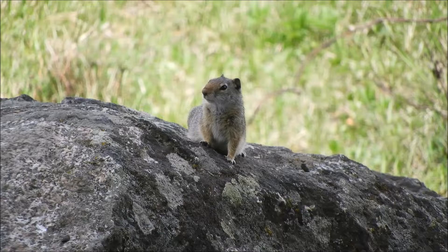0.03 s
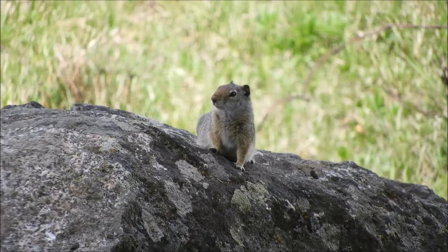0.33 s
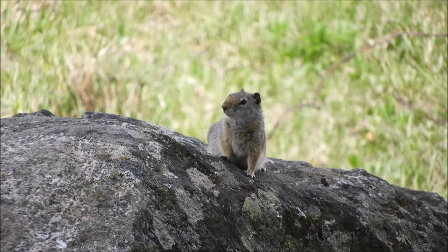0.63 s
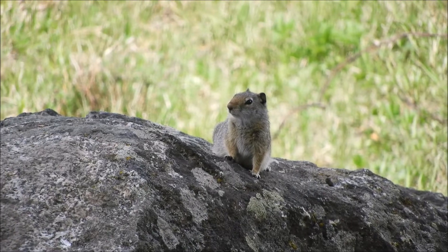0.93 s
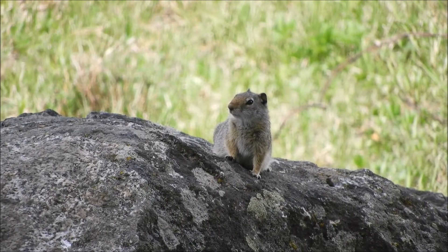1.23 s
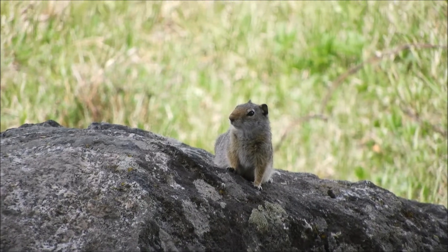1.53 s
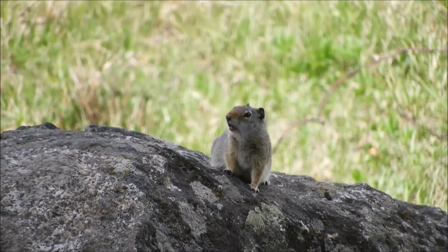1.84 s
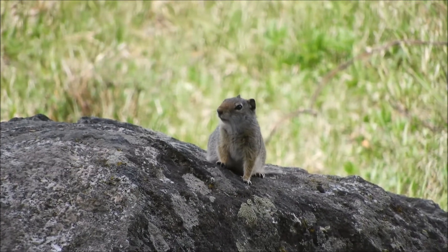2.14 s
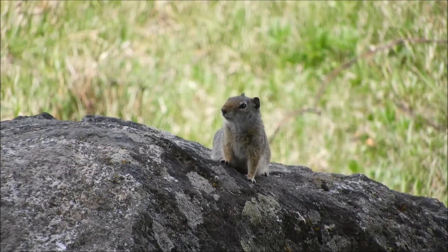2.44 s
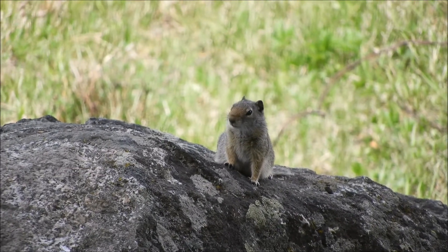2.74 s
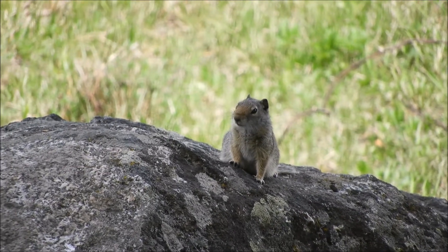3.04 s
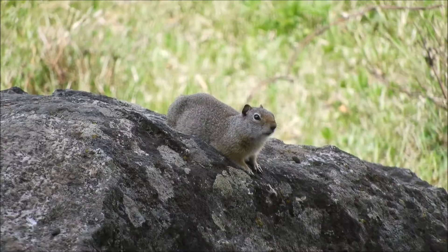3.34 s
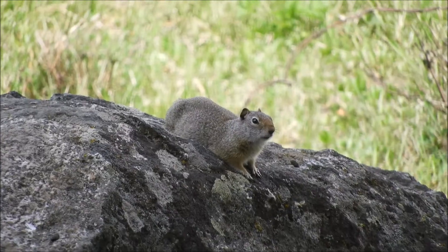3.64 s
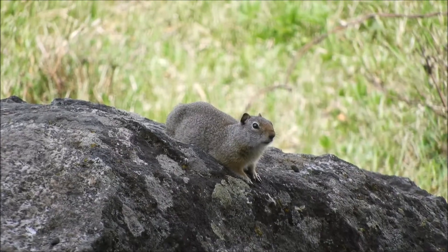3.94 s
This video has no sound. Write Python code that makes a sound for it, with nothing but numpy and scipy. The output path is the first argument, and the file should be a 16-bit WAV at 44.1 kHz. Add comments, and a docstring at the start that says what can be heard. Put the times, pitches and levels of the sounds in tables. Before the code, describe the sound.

A ground squirrel gives two quick high chirps over light wind rumble and hiss.

```python
"""After a moment of silence, light wind rumbles and thumps on two microphone ports over hiss and a low hum.
A far bird trills faintly, grass rustles, and something small and close clicks. Midway, a ground squirrel
on a boulder gives two quick alarm chirps: whistles that drop onto a held pitch and linger as the meadow
scatters them back. A second click follows and the wind picks up. The sound cuts out for an instant,
then the strongest gust hits."""
import sys
import numpy as np
from scipy import signal
from scipy.fft import rfft, irfft, next_fast_len
from scipy.io import wavfile
from scipy.ndimage import uniform_filter1d, map_coordinates

SR = 44100
rng = np.random.default_rng(int(sys.argv[2]) if len(sys.argv) > 2 else 0)


def int16_out(signal):
    """Quantize to a 16-bit WAV file."""
    q = np.round(np.clip(np.atleast_2d(signal).T, -1, 1) * 32767)
    wavfile.write(sys.argv[1], SR, q.astype(np.int16))


N = 176400

# alarm chirps (start [s], length [s], held pitch [Hz], fundamental level [dB], octave level [dB])
CHIRPS = [(2.0795, 0.054, 4413, -29.5, -28), (2.2036, 0.034, 4301, -28, -27.5)]
# colour of the breathy rasp (frequency [Hz], gain [dB])
RASP_EQ = [(2500, -30), (4500, -5), (7000, 5), (10000, -11), (15000, -16)]
DROP_HZ, DROP_S, SETTLE_HZ, SETTLE_S = 640, .0019, 320, .0085
TONE_ATTACK_S, OCTAVE_ATTACK_SHARE, RELEASE_S = 0.0055, .27, 0.012
TONE_FADE_DB_PER_S, OCTAVE_FADE_DB_PER_S = 159, 444
THIRD_DB, RASP_DB = -35, -26  # third harmonic and rasp, relative to the octave
JITTER_SHARE, FLUTTER_DB = 0.0022, 0.6  # roughness of pitch and level
CALL_LEAD_S = .000014  # the call reaches the left port first

# decay of the meadow's scattered tail (frequency [Hz], t60 [s])
MEADOW_DECAY = [(3000, 0.21), (4500, 0.26), (9000, 0.19), (14000, 0.069)]
# EQ on the send to the echoes (frequency [Hz], gain [dB])
MEADOW_EQ = [(3000, -2), (4150, -8), (4400, -0.5), (4850, -1), (5600, -5), (8500, -16), (14000, -20)]
MEADOW_DB = -3.5
FAR_ECHO_S, FAR_ECHO_DB, FAR_ECHO_T60, FAR_LOWPASS_HZ = .08, -17, 0.2, 5600

# two-stage clicks (snap time [s], snap level [dB], tap level [dB])
CLICKS = [(1.5655, -24, -37), (2.9483, -28.5, -38)]
# woody ring of the tap (frequency [Hz], level [dB], t60 [s])
TAP_MODES = [(1250, -11, 0.022), (2180, -6, 0.046), (2480, -6.5, 0.033), (2830, -3.5, 0.019),
             (3870, -6.5, 0.016)]
# colour of the tap's noise burst (frequency [Hz], gain [dB])
TAP_EQ = [(500, -12), (1200, -8), (2500, -3), (4000, -21), (5000, -27), (12000, -47)]
# bright ring of the snap (frequency [Hz], level [dB], t60 [s])
SNAP_MODES = [(4400, -4, 0.017), (5530, -9.5, 0.017), (6730, -13.5, .013), (7600, -8, 0.011),
              (8970, -13.5, 0.013), (9860, -12, 0.0072)]
# colour of the snap's crack (frequency [Hz], gain [dB])
SNAP_EQ = [(1000, -27), (3500, -16), (4300, 6.5), (6400, -1), (8000, -1.5), (10300, 2), (12000, -12),
           (16000, -20)]
TAP_LEAD_S, TAP_ATTACK_S, TAP_NOISE_DB, TAP_NOISE_T60 = 0.0099, .0008, -7.5, 0.045
GRAZE_S, GRAZE_DB = .008, -6  # a light touch before the tap
SNAP_ATTACK_S, SNAP_HIGHPASS_HZ, REBOUND_S, REBOUND_DB = .00015, 3600, 0.001094, -4
CRACK_DB, CRACK_T60, CRACK_TAIL_DB, CRACK_TAIL_T60 = -7.5, 0.0055, -6.5, 0.043

# eddies that hit one port (time [s], level [dB], frequency [Hz], port [0 left, 1 right])
THUMPS = [(0.138, -17.5, 97, 0), (0.208, -17, 87, 0), (0.27, -13, 95, 0), (.294, -18, 77.4, 0),
          (.403, -22.5, 99, 0), (0.423, -14.5, 101, 0), (.486, -20, 116, 0), (1.404, -21, 109, 0),
          (1.486, -19.5, 109, 0), (1.6062, -7.5, 87, 0), (1.623, -17.5, 71, 0), (2.604, -23, 88, 1),
          (2.627, -17, 89, 1), (2.884, -15.5, 113, 0), (2.921, -16.5, 90, 1), (2.946, -17, 127, 1),
          (3.049, -14, 122, 0), (3.142, -16.5, 90, 1), (3.167, -21.5, 80, 0), (3.206, -16.5, 80.6, 0),
          (3.248, -17, 89, 0), (3.299, -11, 98, 0), (3.385, -17, 114, 0), (3.44, -16.5, 96, 0),
          (3.524, -21.5, 113, 1), (3.668, -17.5, 65, 0), (3.731, -10.5, 60, 0), (3.7476, -7, 131.3, 0),
          (3.777, -21, 69.6, 0)]
THUMP_LEAK_DB, THUMP_WIDTH_RAD = -27.5, 1.87
# gusts that drive the buffeting (time [s], level [dB])
GUST_LEVEL = [(.12, -38), (.3, -40), (.5, -40.5), (.6, -46.5), (1.35, -47.5), (1.6, -34.5), (1.7, -45.5),
              (2.3, -46), (2.65, -38.5), (2.8, -47), (2.9, -33), (3.3, -35.5), (3.58, -44), (3.68, -33),
              (3.77, -28), (3.82, -51)]
# colour of the buffeting (frequency [Hz], gain [dB])
BUFFET_EQ = [(15, -3.5), (35, -15.5), (90, -0.5), (160, -8), (220, -20), (280, -26), (600, -61),
             (2000, -78)]
# colour of the steady wind rumble (frequency [Hz], gain [dB])
RUMBLE_EQ = [(15, 6), (35, -17), (60, -1), (110, -1.5), (160, -1.5), (220, -9), (260, -19.5), (500, -38),
             (2000, -66)]
LUMP_DB, RUMBLE_DB = 4, -42
# colour of the distant wind (frequency [Hz], gain [dB])
AIR_EQ = [(150, -46), (250, -5), (404, -5), (558, -7), (617, -6), (1130, -10.5), (1380, -15.5), (1800, -16),
          (3600, -21), (4680, -37), (7920, -120)]
# slow swells of the distant wind (time [s], level [dB])
AIR_LEVEL = [(.1, -57), (.7, -56), (1.2, -54.5), (1.7, -57), (2.4, -54.5), (2.9, -56.5), (3.4, -54.5),
             (4, -57)]
AIR_SWAY_DB, AIR_PATCH_DB = .8, 3

# soft stirs in the grass (time [s], half length [s], level [dB])
RUSTLES = [(0.747, 0.073, -61.5), (1.19, 0.05, -56), (1.903, 0.053, -56.5)]
# colour of the grass (frequency [Hz], gain [dB])
RUSTLE_EQ = [(300, -10), (1200, 0.5), (2400, 0), (4000, -11), (12000, -27)]
BIRD_START_S, BIRD_LENGTH_S, BIRD_DB = .48, .4, -64

# colour of the hiss (frequency [Hz], gain [dB])
HISS_EQ = [(1500, -11.5), (3400, -5), (4300, 2), (6000, -1), (7300, -3.5), (9000, -4.5), (11000, -9),
           (15000, -14.5), (15400, -8)]
# partials of the low hum (frequency [Hz], rms level [dB])
HUM_PARTIALS = [(23.5, -48), (47.5, -45.5), (71, -49.5)]
# narrow bands of the whirr (frequency [Hz], width [Hz], rms level [dB])
WHIRR_BANDS = [(305.7, 16, -66.5), (349, 9.2, -72), (399.2, 10.3, -69.5), (621, 31, -71.5),
               (907, 19, -69.5), (1052, 69, -76), (1520, 70, -79.5), (1845, 40, -73.5), (2240, 73, -88)]
# swell and fade of the thin whine (time [s], level [dB])
WHINE_LEVEL = [(.1, -70.5), (1.8, -72), (2.4, -68.5), (2.9, -74), (4, -77)]
HISS_DB, WHIRR_SWAY_DB = -54.5, 1.2

# mutes on the whole mix (start [s], end [s])
SILENCES = [(-1, .105), (3.319, 3.375)]
MUTE_FADE_S, TOP_HZ = .003, 15300


def squirrel():
    """Each whistle drops fast, then settles on its pitch; the octave fades before the fundamental."""
    out = np.zeros((2, N))
    rasp = amp(RASP_DB) * noise(RASP_EQ, alike=0.51)
    for start, length, hz, tone_db, octave_db in CHIRPS:
        t = np.maximum(clock() - start, 0)
        pitch = hz + DROP_HZ * np.exp(-t / DROP_S) + SETTLE_HZ * np.exp(-t / SETTLE_S)
        phase = 2 * np.pi * np.cumsum(pitch * (1 + JITTER_SHARE * wobble(500))) / SR
        attack = OCTAVE_ATTACK_SHARE * length
        held = np.maximum(t - attack, 0)
        release = 1 - ramp((t - length) / RELEASE_S + .5)
        tone_level = amp(tone_db - TONE_FADE_DB_PER_S * held + FLUTTER_DB * wobble(400))
        tone = pan(db=0.5) * ramp(t / TONE_ATTACK_S) * tone_level * np.sin(phase)
        octave_envelope = ramp(t / attack) ** 1.4 * amp(octave_db - OCTAVE_FADE_DB_PER_S * held)
        overtones = pan(db=-1.0) * np.sin(2 * phase) + amp(THIRD_DB) * np.sin(3 * phase)
        out += release * (tone + octave_envelope * (overtones + rasp))
    advance_s = np.array([[1], [-1]]) * CALL_LEAD_S / 2
    return filtered(out, lambda hz: np.exp(2j * np.pi * hz * advance_s))


def meadow(call):
    """Rock and grass scatter a short tail; the far side of the meadow returns a dull, diffuse echo."""
    hz, t, grains = signal.stft(rng.standard_normal((2, SR // 2)), SR, nperseg=256)
    tail = signal.istft(grains * decay(t, along(MEADOW_DECAY, hz)[:, None]), SR, nperseg=256)[1]
    since_echo = np.arange(tail.shape[1]) / SR - FAR_ECHO_S
    far_tail = rng.standard_normal(tail.shape) * decay(since_echo, FAR_ECHO_T60)
    send = filtered(call, lambda hz: amp(along(MEADOW_EQ, hz)))
    far_send = filtered(send, lambda hz: 1 / (1 + (hz / FAR_LOWPASS_HZ) ** 10))
    return amp(MEADOW_DB) * reverb(send, tail) + amp(FAR_ECHO_DB) * reverb(far_send, far_tail)


def clicks():
    """A woody tap, then a thin, bright snap that rebounds once: each short modes plus a noise burst."""
    tap_noise = amp(TAP_NOISE_DB) * noise(TAP_EQ, alike=0.49)
    crack_noise = amp(CRACK_DB) * noise(SNAP_EQ, alike=0.085)
    out = np.zeros((2, N))
    for start, snap_db, tap_db in CLICKS:
        t = clock() - start
        since_tap = t + TAP_LEAD_S
        tap = ring(TAP_MODES, since_tap, TAP_ATTACK_S) + tap_noise * decay(since_tap, TAP_NOISE_T60)
        graze = amp(GRAZE_DB) * ring(TAP_MODES, since_tap + GRAZE_S, TAP_ATTACK_S)
        strike = ring(SNAP_MODES, t, SNAP_ATTACK_S)
        rebound = amp(REBOUND_DB) * ring(SNAP_MODES, t - REBOUND_S, SNAP_ATTACK_S)
        crack = crack_noise * (decay(t, CRACK_T60) + amp(CRACK_TAIL_DB) * decay(t, CRACK_TAIL_T60))
        snap = filtered(strike + rebound + crack, lambda hz: 1 - 1 / (1 + (hz / SNAP_HIGHPASS_HZ) ** 12))
        out += amp(snap_db) * snap + amp(tap_db) * (tap + graze)
    return pan(db=-2.5) * out


def thumps():
    """An eddy pushes and then pulls on one port; the other barely feels it."""
    out = np.zeros((2, N))
    for centre, db, hz, port in THUMPS:
        phase = 2 * np.pi * hz * (clock() - centre)
        push_pull = -np.sin(phase) * np.exp(-(phase / THUMP_WIDTH_RAD) ** 2 / 2)
        reach = np.where(np.arange(2) == port, 1, amp(THUMP_LEAK_DB))
        out += reach[:, None] * amp(db) * push_pull
    return out


def wind():
    """Lumpy buffeting that differs from port to port, over a steady rumble and the rush of distant air."""
    lumps = amp(LUMP_DB * np.array([wobble(18), wobble(18)]))
    buffet = amp(curve(GUST_LEVEL)) * pan(db=4.5) * unit(lumps * noise(BUFFET_EQ, alike=0.45))
    air_level = amp(curve(AIR_LEVEL) + AIR_SWAY_DB * wobble(8.22))
    air = pan(db=1.5) * air_level * patchy(noise(AIR_EQ, alike=0.62), AIR_PATCH_DB)
    rumble = amp(RUMBLE_DB) * noise(RUMBLE_EQ, alike=0.99)
    return buffet + rumble + air


def grass():
    """Grass stirs in soft, short swells of midrange noise."""
    stir = sum(amp(db) * np.exp(-((clock() - centre) / half) ** 2) for centre, half, db in RUSTLES)
    return stir * noise(RUSTLE_EQ, alike=0.38)


def far_bird():
    """A faint trill, smeared by distance into one swell of narrow noise."""
    swell = np.sin(np.pi * np.clip((clock() - BIRD_START_S) / BIRD_LENGTH_S, 0, 1))
    return amp(BIRD_DB) * swell * band(centre_hz=4040, width_hz=110)


def background():
    """The bed: a wavering low hum, a faint whirr, a thin whine that fades late and an even hiss."""
    hum = sum(amp(db) * np.sqrt(2) * np.sin(2 * np.pi * hz * clock() + 0.56 * wobble(3.98))
              for hz, db in HUM_PARTIALS)
    whirr = sum(amp(db + WHIRR_SWAY_DB * wobble(2.83)) * band(hz, width) for hz, width, db in WHIRR_BANDS)
    whine = amp(curve(WHINE_LEVEL)) * band(centre_hz=2463, width_hz=52)
    hiss = amp(HISS_DB) * pan(db=1.5) * noise(HISS_EQ, alike=0.013)
    return hum + whirr + whine + hiss


def ring(modes, t, attack):
    """Damped modes that reach the two ports a little out of phase."""
    phases = rng.uniform(0, 2 * np.pi, (len(modes), 1, 1))
    phases = phases + rng.uniform(0, np.pi / 2, (len(modes), 2, 1))
    tones = sum(amp(db) * decay(t, t60) * np.sin(2 * np.pi * hz * t + phase)
                for (hz, db, t60), phase in zip(modes, phases))
    return ramp(t / attack) * tones


def reverb(send, tail):
    """Convolve with a stereo tail, scaled to unit energy on the left."""
    return signal.fftconvolve(send, tail / np.linalg.norm(tail[0]), axes=1)[:, :N]


def noise(eq, alike):
    """Coloured stereo noise of rms 1; alike is the left-right correlation."""
    mid, side = filtered(rng.standard_normal((2, N)), lambda hz: amp(along(eq, hz)))
    spread = np.arccos(alike) / 2
    mid, side = np.cos(spread) * mid, np.sin(spread) * side
    return unit(np.array([mid + side, mid - side]))


def band(centre_hz, width_hz):
    """Narrow stereo noise of rms 1, mostly alike on both sides."""
    white = rng.standard_normal((2, N))
    mid, side = filtered(white, lambda hz: 1 / (1 + (2 * (hz - centre_hz) / width_hz) ** 2))
    return unit(np.array([mid + 0.21 * side, mid - 0.67 * side]))


def patchy(x, depth_db):
    """Each region of time and frequency swells and sinks on its own."""
    grains = signal.stft(x, nperseg=1024)[2]
    swells = uniform_filter1d(rng.standard_normal(grains.shape[1:]), size=5, axis=0)
    swells = uniform_filter1d(swells, size=9, axis=1)
    return unit(signal.istft(grains * amp(depth_db * unit(swells)), nperseg=1024)[1][:, :N])


def filtered(x, response):
    """Shape x with a gain that is a function of frequency."""
    size = next_fast_len(N + SR // 2)
    return irfft(rfft(x, size) * response(np.fft.rfftfreq(size, 1 / SR)), size)[..., :N]


def along(points, hz):
    """Join (frequency [Hz], value) points on a log axis."""
    knots_hz, values = np.transpose(points)
    return np.interp(np.log(hz + 1), np.log(knots_hz + 1), values)


def curve(points):
    """An automation line through (time [s], value) points."""
    return np.interp(clock(), *np.transpose(points))


def wobble(rate):
    """Smooth random modulation, rate knots a second."""
    return map_coordinates(rng.standard_normal(int(N * rate / SR) + 4), [clock() * rate])


def ramp(u):
    """A quarter-sine fade from 0 to 1."""
    return np.sin(np.pi / 2 * np.clip(u, 0, 1))


def decay(t, t60):
    return (t >= 0) * amp(-60 * np.abs(t) / t60)


def pan(db):
    """Stereo gains with the left db above the right."""
    return amp(np.array([[db], [-db]]) / 2)


def amp(db):
    return 10 ** (np.asarray(db) / 20)


def unit(x):
    return x / np.sqrt(np.mean(x ** 2) + 1e-20)


def clock():
    return np.arange(N) / SR


def scene():
    """The call and its echoes up front, with clicks, wind and the quiet meadow behind."""
    call = squirrel()
    return call + meadow(call) + clicks() + thumps() + wind() + grass() + far_bird() + background()


def record(dry):
    """Mute the mix at the start and once more briefly, then cut the very top of the treble."""
    t = clock()
    gates = [ramp(np.maximum(start - t, t - end) / MUTE_FADE_S) ** 2 for start, end in SILENCES]
    return filtered(dry * np.prod(gates, axis=0), lambda hz: hz < TOP_HZ)


dry = scene()
out = record(dry)
int16_out(out)
```